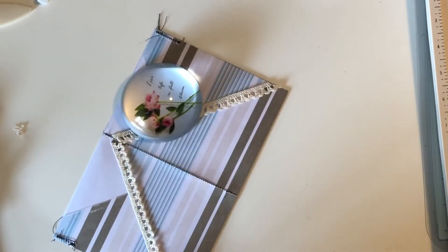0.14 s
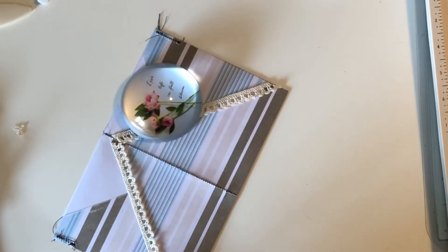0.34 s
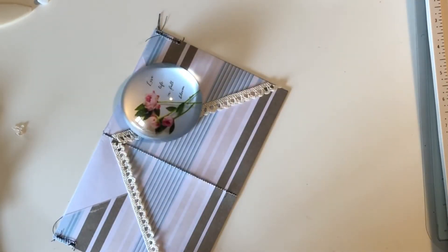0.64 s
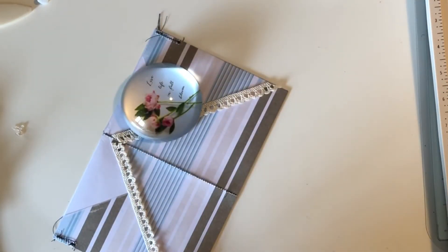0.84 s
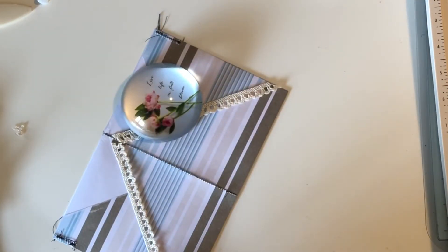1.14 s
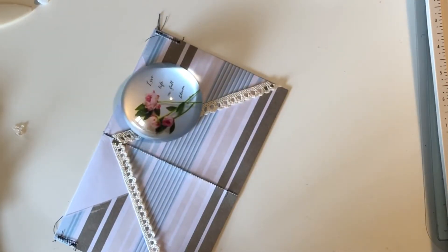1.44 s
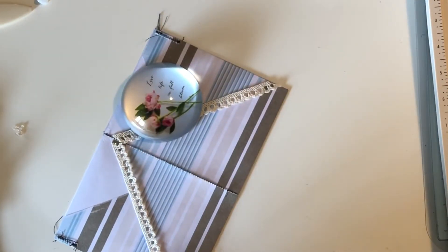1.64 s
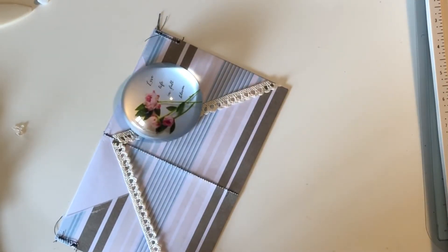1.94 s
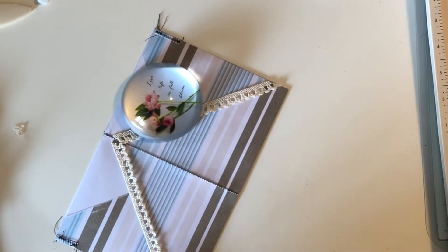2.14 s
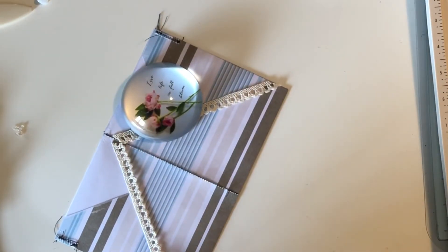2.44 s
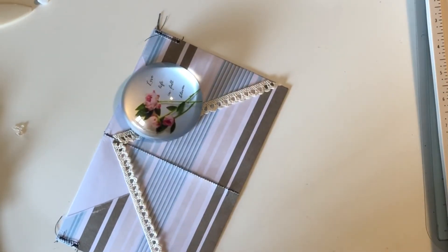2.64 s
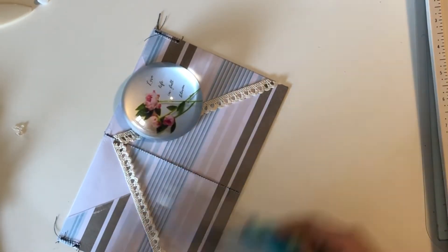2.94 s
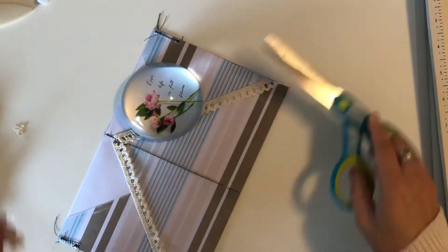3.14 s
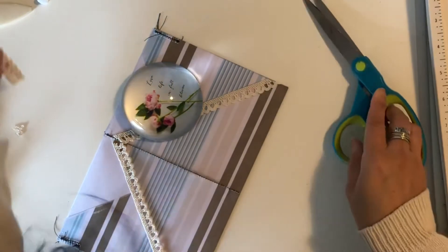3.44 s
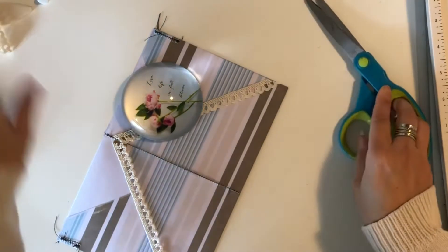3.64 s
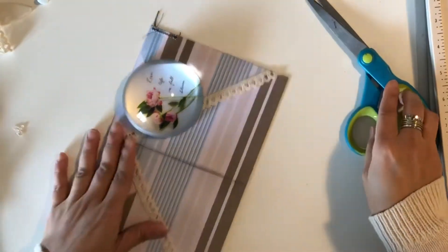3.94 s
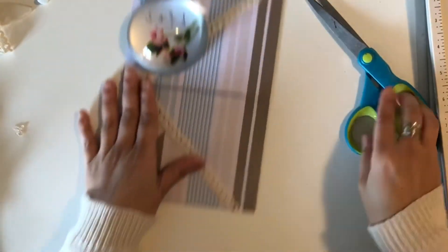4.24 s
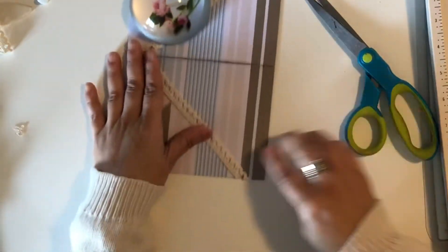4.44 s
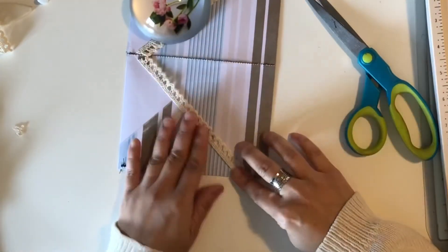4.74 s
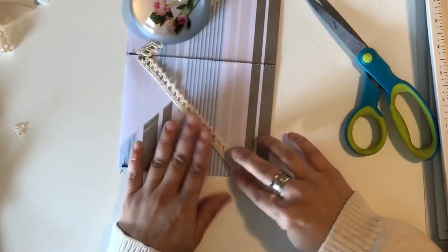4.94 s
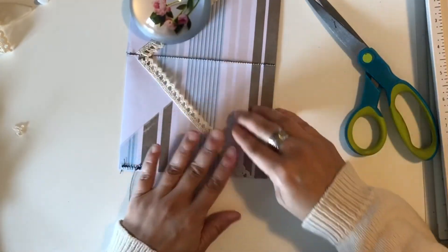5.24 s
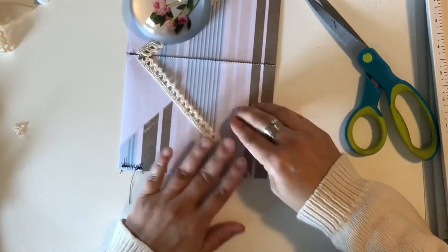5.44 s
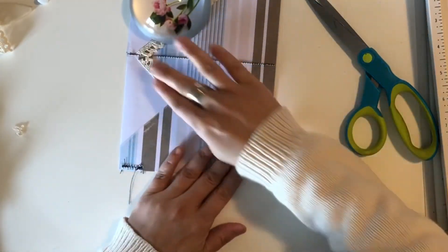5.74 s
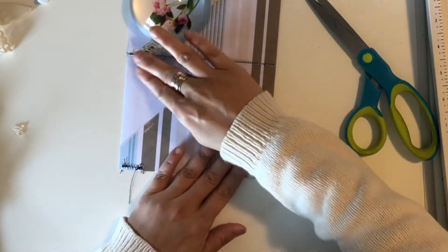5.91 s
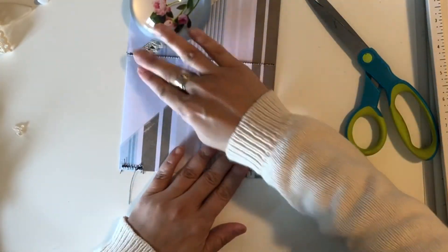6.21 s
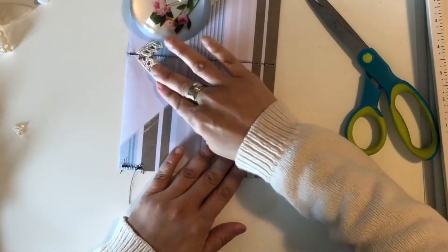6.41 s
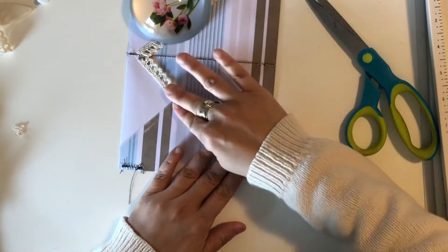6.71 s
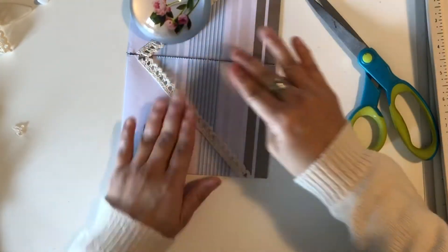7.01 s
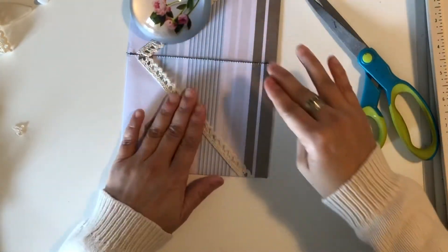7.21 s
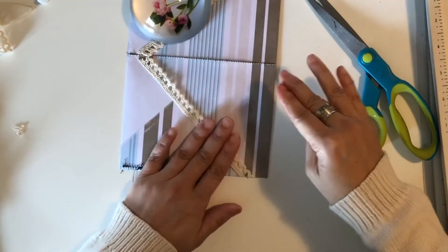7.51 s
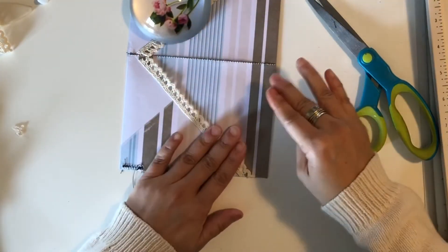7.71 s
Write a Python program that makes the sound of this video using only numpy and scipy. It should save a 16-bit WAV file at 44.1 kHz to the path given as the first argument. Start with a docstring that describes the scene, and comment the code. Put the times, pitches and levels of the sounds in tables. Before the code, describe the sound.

In a quiet room, table knocks and a short scissor crunch lead to a smooth card hiss, then soft finger thuds and faint rustles.

```python
"""A craft table in a quiet room, close to one microphone, over a steady hush and a heaving rumble.
First, things are set down: each contact ticks, clacks and pings, then sends a bending wave through the
tabletop, high tones first. Scissors then chew through lace in crackling, grinding jerks and are laid on the board.
Next a hand slides a sheet of card, a smooth friction hiss, and fingers pat and smooth it: soft ticks and thuds
among brushes and lone crackles."""
import sys
import numpy as np
from scipy import signal
from scipy.fft import rfft, irfft, next_fast_len
from scipy.io import wavfile
from scipy.ndimage import uniform_filter1d, map_coordinates

SR = 44100
rng = np.random.default_rng(int(sys.argv[2]) if len(sys.argv) > 2 else 0)


def to_wav(sig):
    """Store sig (one row per channel, or 1-D mono) as 16-bit WAV at the path in sys.argv[1].

    Samples outside -1..1 are clipped; the rate is SR.
    """
    pcm = np.clip(np.atleast_2d(sig), -1, 1) * 32767
    pcm = np.round(pcm).astype(np.int16)
    wavfile.write(sys.argv[1], SR, pcm.T)  # frames by channels


N = 347066  # samples

# Hard things meeting the table. Each row: start in seconds, tick level in dB, tick lift above 8 kHz in dB,
# clack level in dB, clack centre in Hz, ping level in dB, ping centre in Hz, low and middle board levels in dB.
TAPS = [(0.2693, -44, -30, -35.5, 1140, -42, 1960, -38.5, -29.5),
        (0.6903, -63, -25, -51, 1160, -57.5, 1920, -47.5, -40.5),
        (1.3419, -68, -17, -55, 1150, -68, 1970, -56.5, -45.5),
        (1.4878, -66, -18, -61, 780, -72, 1950, -61.5, -62.5),
        (1.786, -57, -16, -69, 703, -74, 2380, -56.5, -63.5),
        (1.8962, -52, 3, -45.5, 750, -58, 1940, -40, -40),
        (1.9185, -58, -15, -53, 710, -59, 2300, -45, -43),
        (2.4399, -40, -29, -49, 703, -39, 1960, -32.5, -28),
        (2.4541, -49, -19, -50, 826, -44, 1980, -39.5, -33.5),
        (2.4869, -40, -19, -39, 704, -44, 1960, -45, -33),
        (2.6727, -48, -7, -54, 1820, -39, 2330, -48.5, -65),
        (3.28, -51.5, -21, -53, 1320, -57.5, 2150, -49.5, -52),
        (3.3936, -38.5, -28, -37.5, 950, -49, 1930, -39.5, -30),
        (3.5214, -55, -3.5, -60, 1260, -66, 2390, -71, -67),
        (3.5778, -50.5, -14, -31, 1340, -44, 1820, -67, -43.5),
        (3.5933, -61, -20, -42, 1650, -53, 1800, -52.5, -49),
        (3.702, -64, -18, -55, 1300, -66, 2090, -64, -51.5),
        (3.7483, -35, -15, -29.5, 740, -33, 3140, -49.5, -41),
        (3.8188, -43, -15, -37.5, 1190, -47, 1800, -37, -38)]
# Fingers landing on the card. Each row: start in seconds, tick, clack, low board and middle board levels in dB.
PATS = [(3.8399, -42, -58, -41, -53.5), (4.99, -39, -43, -36, -30.5), (5.252, -41, -49, -29, -28.5),
        (5.452, -43, -48, -29, -26.5), (5.886, -61, -76, -59.5, -63.5), (6.2537, -59, -68, -63.5, -68.5),
        (6.542, -59, -75, -55, -60), (7.0225, -43, -46, -32, -33), (7.333, -35, -35, -27, -19.5),
        (7.5023, -58, -55, -57.5, -51.5), (7.604, -39, -41, -30, -24.5), (7.6977, -57, -55, -50, -52.5)]
# Modes of the tabletop. Each row: frequency in Hz, relative level in dB, time to fall 60 dB in seconds.
BOARD_MODES = [(72.4, -6.5, 0.15), (122, 1.5, 0.1), (148.3, 4, 0.0726), (222, -1.5, 0.0525),
               (255, 3.5, 0.054), (303.7, -2.5, 0.0564), (496, -2, 0.0351), (605, -6.5, 0.04),
               (747, -7, 0.0028)]
# Low, middle and high board modes in turn. Each row: rise in seconds, passing time of the packet in seconds.
PACKETS = [(.004, .027), (.0011, .024), (.0009, .019)]
# What rings on after the packet. Each row: frequency in Hz, relative level in dB, time to fall 60 dB in seconds.
LINGER_MODES = [(236, -3, .2), (258, 0, .24)]
# The table rocking on its legs. Each row: frequency in Hz, relative level in dB, time to fall 60 dB in seconds.
SWAY_MODES = [(81.6, 1, 0.2), (98.3, -2, .14)]
# Hard things that clack. Each row: frequency in Hz, relative level in dB, free time to fall 60 dB in seconds.
HANDLE_MODES = [(755, 3, 0.041), (847, -3.5, 0.072), (950, -4, 0.042), (1140, -0.5, 0.039), (1226, 7, 0.03),
                (1300, -8.5, 0.062), (1447, -4.5, 0.052), (1688, -1, 0.03), (1960, -2, 0.03),
                (2240, 4.5, 0.013), (2530, -1, 0.019), (3113, 2, 0.019), (3314, -2, 0.023),
                (3720, -10, 0.021), (4740, -4, 0.019)]
# Dense small modes of a knock. Each row: frequency in Hz, relative density in dB per Hz.
WOODY_SPECTRUM = [(350, -40), (600, -3), (1100, 1.5), (1600, -2), (2200, -6), (3500, -11.5), (7000, -30)]
# Scuffs and ticks. Each row: frequency in Hz, relative density in dB per Hz.
CRACKLE_SPECTRUM = [(500, -34), (1200, 2.5), (2000, -0.5), (4000, 2), (6500, 1.5), (9500, -3.5),
                    (12000, -0.5), (16000, -5.5)]
# Jerks of the blades through lace. Each row: start in seconds, crackle peak in dB, lift above 8 kHz in dB,
# board knock in dB.
BITES = [(2.088, -63, -13, -62), (2.116, -60, -15, -54), (2.127, -54.5, -12, -51), (2.141, -60, -15, -54),
         (2.152, -56, -10, -49), (2.173, -55.5, -6, -48), (2.207, -52, -2, -42), (2.24, -56, -7, -47),
         (2.2665, -52, 0, -40), (2.29, -53, 2, -41), (2.305, -56, 2, -40), (2.423, -65, -11, -55),
         (2.4314, -54.5, 1, -47), (2.445, -62, 5, -47), (2.4714, -57, 4, -43)]
# Lace parting steadily between jerks. Each row: start in seconds, length in seconds, level in dB.
CUTS = [(2.075, .28, -65), (2.42, .1, -66)]
# Lace parting. Each row: frequency in Hz, relative density in dB per Hz.
LACE_SPECTRUM = [(500, -34), (1500, -5), (4000, 1), (7200, 0), (8300, -7), (10500, -8), (11800, 1),
                 (14000, 1), (16000, -3)]
# Grinding blades. Each row: frequency in Hz, relative density in dB per Hz.
BLADE_SPECTRUM = [(240, -49), (400, 9), (426, -22), (597, 3.5), (1120, 3), (1610, -16.5), (1940, -7),
                  (2560, -16), (3050, -10), (6460, -36), (8000, -50), (10400, -42), (17600, -120)]
# Blades and handles working on the board. Each row: start in seconds, length in seconds, grind level in dB,
# board shake in dB.
RUBS = [(1.48, .05, -67, -64), (1.53, .08, -69, -66), (2.075, .1, -55, -60), (2.13, .24, -58, -54),
        (2.43, .1, -54, -46), (3.285, .055, -61, -60), (3.585, .08, -59, -59), (3.62, .14, -63, -55),
        (3.73, .03, -55, -60), (7.69, .07, -58.5, -61)]
# A dragged handle singing. Each row: start in seconds, length in seconds, level in dB.
SINGS = [(3.69, .065, -57)]
# The mode it sings on. Each row: frequency in Hz, relative level in dB, time to fall 60 dB in seconds.
SING_MODES = [(1300, 0, 0.084)]
# The card slid across the board. Each row: time in seconds, level in dB, treble lift in dB.
SLIDE = [(3.822, -58, 2), (3.845, -51, 1), (3.882, -61, -4), (3.932, -51, -5), (4.05, -47.5, 0),
         (4.156, -44.5, 4.5), (4.31, -49, -3), (4.45, -66, -6), (4.48, -64, 1), (4.58, -82, -8)]
# Light brushes of card, lace, skin or sleeve. Each row: start in seconds, length in seconds, peak in dB,
# treble lift in dB.
BRUSHES = [(1.49, .06, -72, -8), (1.9, .06, -75, -5), (2.49, .07, -72, 2), (2.65, .06, -66, -5),
           (2.82, .5, -78, 8), (3.33, .46, -79, 8), (4.63, .14, -65, -3), (4.855, .07, -68, 8),
           (5.135, .05, -72, 6), (6.76, .04, -75, 4), (6.83, .18, -66, -18), (7.17, .04, -64, 0),
           (7.2, .07, -70, -15), (7.62, .14, -70, -12)]
# Gliding card. Each row: frequency in Hz, relative density in dB per Hz.
CARD_SPECTRUM = [(180, -48), (300, -11), (348, -17), (404, -24), (492, -7), (535, -7.5), (620, -9),
                 (1070, -13), (1370, -4.5), (1560, -10.5), (4350, -0.5), (8280, -4.5), (15500, -5.5)]
# Card and lace crackling once. Each row: start in seconds, peak in dB, lift above 8 kHz in dB, length in seconds.
SCUFFS = [(2.642, -71, -5, .01), (3.203, -73, 3, .018), (3.298, -68, -19, .022), (3.313, -68.5, -18, .018),
          (3.3796, -66, -28, .017), (3.526, -68, -3, .019), (3.5593, -68, -3, .013), (4.656, -65, -3, .01),
          (4.712, -65.5, -12, .021), (4.862, -71, -6, .015), (5.185, -63, -3, .006),
          (5.2378, -55, -10, .006), (5.347, -72, 5, .024), (6.092, -73.5, 4, .017),
          (6.4064, -76.5, 4, .022), (6.71, -76, 4, .022), (7.173, -71, -2, .015), (7.573, -66, -5, .005),
          (7.62, -67, -15, .025), (7.78, -72, 1, .03)]
# Room and microphone noise. Each row: frequency in Hz, relative density in dB per Hz.
HUSH_SPECTRUM = [(59, -55), (100, 3), (328, -4), (373, -5), (570, -9.5), (1950, -20), (2220, -19.5),
                 (2800, -22.5), (3250, -21.5), (14700, -32), (16000, -26)]
# The house rumbling, before its random heave. Each row: time in seconds, level in dB.
RUMBLE = [(0.0, -68), (0.45, -63), (0.9, -67), (1.25, -64), (2.0, -70), (4.5, -68), (5.5, -63), (6.5, -68),
          (7.4, -66), (7.87, -59)]
# Rumble. Each row: frequency in Hz, relative density in dB per Hz.
RUMBLE_SPECTRUM = [(20, -6), (35, 1), (50, 7), (75, -0.5), (130, -13), (250, -36)]
# Decay of the room. Each row: frequency in Hz, time to fall 60 dB in seconds.
WALL_T60 = [(100, 0.33), (1000, 0.21), (4000, 0.19), (12000, 0.085)]
# How much reaches the walls. Each row: frequency in Hz, level in dB.
WALL_LEVEL = [(100, -17), (300, -21.5), (800, -14.5), (2500, -11.5), (10000, -13.5)]

TAP_TICK_S, PAT_TICK_S = .012, .016  # time to fall 60 dB
TAP_RING, PAT_RING = .85, .42  # share of the free ringing time left
PAT_PING_HZ, PAT_CLACK_HZ = 3100, 880
PAT_AIR_DB, PAT_PING_DB = -5, -14  # top above 8 kHz and ping, against the tick
LEAD_S, LEAD_LENGTH_S = .008, .015  # crackle ahead of a fingertip
LEAD_DB, LEAD_AIR_DB = -17, 2  # against the tick; lift above 8 kHz
HIGH_UNDER_MID_DB, HIGH_UNDER_CLACK_DB = -11, -10  # high board modes under middle board, under clack
DENSE_DB, SWAY_DB, LINGER_DB = -10, -13.5, -31  # against clack, low board, middle board
SPREAD_DB = 2.5  # random spread of mode strengths
BITE_S, BITE_GRIND_DB, BITE_LOW_DB = .017, 5, -1  # length; grind against crackle; low against middle board
CUT_AIR_DB = -9  # lift above 8 kHz
RISE_SHARE = .35  # part of a stroke spent swelling
HUSH_DB = -71.2
TOP_HZ = 15900


def taps():
    """Hard things load the board at once; fingertips squash first."""
    hard = contacts(TAPS, TAP_TICK_S, TAP_RING, press_s=.0005, tick_rise_s=.0004)
    pats = [(s, db, PAT_AIR_DB, clack_db, PAT_CLACK_HZ, db + PAT_PING_DB, PAT_PING_HZ, low_db, mid_db)
            for s, db, clack_db, low_db, mid_db in PATS]
    return hard + contacts(pats, PAT_TICK_S, PAT_RING, press_s=.001, tick_rise_s=.0018)


def contacts(table, tick_s, ring_share, press_s, tick_rise_s):
    """Surfaces tick, clack and ping; the board's modes answer once it takes the load, press_s later."""
    t = np.arange(SR // 4) / SR
    tick, air, clack, dense, board = np.zeros((5, N + SR))
    held = [(hz, db, t60 * ring_share) for hz, db, t60 in HANDLE_MODES]
    body = [m for m in held if m[0] < 1800]
    ping = [m for m in held if m[0] > 1800]
    for s, tick_db, air_db, clack_db, clack_hz, ping_db, ping_hz, low_db, mid_db in table:
        at = slice(round(s * SR), round(s * SR) + len(t))
        fade = amp(tick_db - 60 * t / tick_s) * (1 - np.exp(-t / tick_rise_s))
        tick[at] += fade
        air[at] += fade * amp(air_db)
        clack[at] += amp(clack_db) * ring(favoured(body, clack_hz), t, SPREAD_DB)
        clack[at] += amp(ping_db) * ring(favoured(ping, ping_hz, narrow_db=40), t, SPREAD_DB)
        dense[at] += amp(clack_db + DENSE_DB - 60 * t / .053) * (1 - np.exp(-t / .0017))
        high_db = max(mid_db + HIGH_UNDER_MID_DB, clack_db + HIGH_UNDER_CLACK_DB)
        board[round((s + press_s) * SR):][:len(t)] += thud(low_db, mid_db, high_db)
    ticks = crackle(tick, air, CRACKLE_SPECTRUM, grain_db=1.5)
    chatter = 1 + .3 * wobble(1500)  # the surfaces rattle while they touch
    knocks = clack[:N] * chatter + dense[:N] * hiss(WOODY_SPECTRUM)
    return ticks + knocks + filtered(board[:N], bending)


def thud(low_db, mid_db, high_db):
    """Three groups of board modes as a packet that runs off, a faint ring after it and the table's sway."""
    t = np.arange(SR // 4) / SR
    packet = 0
    bands_hz = [(0, 180), (180, 400), (400, 800)]
    for db, (lo, hi), (rise_s, passing_s) in zip([low_db, mid_db, high_db], bands_hz, PACKETS):
        modes = [m for m in BOARD_MODES if lo < m[0] < hi]
        gate = np.exp(-(t / passing_s) ** 4)
        packet = packet + amp(db) * ring(modes, t, SPREAD_DB, rise_s, shape=1.58) * gate
    after = amp(mid_db + LINGER_DB) * ring(LINGER_MODES, t, SPREAD_DB, rise_s=.02)
    sway = amp(low_db + SWAY_DB) * ring(SWAY_MODES, t, SPREAD_DB, rise_s=.0093)
    return packet + after + sway


def bending(hz):
    """Bending waves travel slower the lower they are; the far edge sends the low ones back."""
    lag_s, edge_s, edge_hz = .0019, .045, 130  # lag at 1 kHz
    back = amp(-8) * np.exp(-2j * np.pi * hz * edge_s) / (1 + (hz / edge_hz) ** 4)
    return np.exp(-4j * np.pi * lag_s * np.sqrt(1000 * hz)) * (1 + back)


def favoured(modes, centre_hz, narrow_db=14):
    """The spot struck favours modes near its centre; narrow_db is the loss one octave away."""
    return [(hz, db - narrow_db * np.log2(hz / centre_hz) ** 2, t60) for hz, db, t60 in modes]


def ring(modes, t, scatter_db, rise_s=.00069, shape=1):
    """Struck modes, peak 1; a shape over 1 holds the ring, then drops it, as a wave packet passing."""
    x = 0
    for hz, db, t60 in modes:
        strength_db = db + scatter_db * rng.standard_normal()
        x = x + amp(strength_db - 60 * (t / t60) ** shape) * np.sin(2 * np.pi * hz * t)
    x = x * (1 - np.exp(-t / rise_s))
    return x / np.abs(x).max()


def bites():
    """Each jerk of the blades crackles, grinds and knocks the board; lace parts steadily between."""
    body, air = puffs([(*row[:3], BITE_S) for row in BITES])
    steady = amp(np.transpose(CUTS)[2]) @ strokes(CUTS) * amp(2.5 * wobble(90))
    board = np.zeros(N + SR)
    for s, _, _, db in BITES:
        board[round(s * SR):][:SR // 4] += thud(db + BITE_LOW_DB, db, db + HIGH_UNDER_MID_DB)
    grinding = amp(BITE_GRIND_DB) * body[:N] * hiss(BLADE_SPECTRUM, grain_db=2.5)
    lace_air = air[:N] + amp(CUT_AIR_DB) * steady
    lace = crackle(body[:N] + steady, lace_air, LACE_SPECTRUM, grain_db=4)
    return lace + grinding + filtered(board[:N], bending)


def grind():
    """Uneven rubbing of the blades shakes the board's modes; a dragged handle sings on one mode."""
    rub, shake = amp(np.transpose(RUBS)[2:]) @ strokes(RUBS)
    blades = rub * amp(2.9 * wobble(60)) * hiss(BLADE_SPECTRUM, grain_db=2.5)
    shaken = shake * driven(BOARD_MODES[1:])  # all but the lowest mode
    singing = amp(np.transpose(SINGS)[2]) @ strokes(SINGS) * driven(SING_MODES)
    return blades + shaken + singing


def driven(modes):
    """Modes kept ringing by random rubbing, rms 1."""
    response = ring(modes, np.arange(SR // 4) / SR, scatter_db=.5)
    return unit(signal.fftconvolve(rng.standard_normal(N), response)[:N])


def glide():
    """Friction hiss; a bright touch lifts treble and thins the body below 3.5 kHz, a dull one the reverse."""
    db, lift_db = curves([SLIDE], quiet=[-120, 0])
    touch = strokes(BRUSHES)
    peak_db, brush_lift_db = np.transpose(BRUSHES)[2:]
    lift_db = lift_db + brush_lift_db @ (touch > 0)
    level = amp(db) + amp(peak_db) @ touch
    rub = hiss(CARD_SPECTRUM, grain_db=1) * level * amp(.6 * wobble(34))
    body = filtered(rub, lambda hz: 1 / (1 + (hz / 3500) ** 4))
    return rub + (amp(lift_db) - 1) * filtered(rub, airy) + (amp(-.35 * lift_db) - 1) * body


def scuffs():
    """Lone crackles of card and lace, and one of the card just before every fingertip lands."""
    leads = [(s - LEAD_S, db + LEAD_DB, LEAD_AIR_DB, LEAD_LENGTH_S) for s, db, *_ in PATS]
    return crackle(*puffs(SCUFFS + leads), CRACKLE_SPECTRUM, grain_db=3.5)


def crackle(body, air, spectrum, grain_db):
    """Crackle noise whose middle and top follow their own envelopes."""
    noise = hiss(spectrum, grain_db)
    top = filtered(noise, airy)
    return body[:N] * unit(noise - top) + air[:N] * unit(top)


def puffs(rows):
    """Envelopes of puffs that swell and die, peaking a third into the length, for middle and top."""
    body, air = np.zeros((2, N + SR))
    for s, db, air_db, length_s in rows:
        u = np.arange(SR // 4) / SR / length_s * 3
        puff = amp(db) * u ** 2 * np.exp(2 - 2 * u)
        body[round(s * SR):][:len(u)] += puff
        air[round(s * SR):][:len(u)] += puff * amp(air_db)
    return body, air


def strokes(rows):
    """One gain curve for each row's start and length: a swell, then a slower fade."""
    start_s, length_s = np.transpose(rows)[:2, :, None]
    u = (np.arange(N) / SR - start_s) / length_s
    ramp = np.clip(np.minimum(u / RISE_SHARE, (1 - u) / (1 - RISE_SHARE)), 0, 1)
    return np.sin(np.pi / 2 * ramp) ** 2


def hiss(spectrum, grain_db=0):
    """Coloured noise of rms 1; grain makes single samples stand out, as fibres catching."""
    grains = amp(grain_db * np.minimum(rng.exponential(size=N), 4))
    return unit(filtered(rng.standard_normal(N) * grains, lambda hz: amp(along(spectrum, hz))))


def airy(hz):
    """The share of a sound above 8 kHz."""
    return 1 / (1 + (8000 / (hz + 1)) ** 6)


def wobble(rate_hz):
    """A smooth random curve through rate_hz knots a second."""
    knots = rng.standard_normal(int(N * rate_hz / SR) + 4)
    return map_coordinates(knots, [np.arange(N) * rate_hz / SR])


def curves(spans, quiet):
    """One value per sample for each column after the time, smoothed over 5 ms; quiet outside the spans."""
    t = np.arange(N) / SR
    out = np.tile(np.reshape(quiet, (-1, 1)), N).astype(float)
    for rows in spans:
        s, *cols = np.transpose(rows)
        inside = (t >= s[0]) & (t <= s[-1])
        out[:, inside] = [np.interp(t[inside], s, c) for c in cols]
    return uniform_filter1d(out, size=221, axis=1)


def along(points, hz):
    """(Hz, value) points interpolated on a log frequency axis."""
    f, v = np.transpose(points)
    return np.interp(np.log(hz + 1), np.log(f + 1), v)


def filtered(x, response):
    """x through a complex response of frequency, zero-padded by at least half a second."""
    m = next_fast_len(x.shape[-1] + SR // 2)
    return irfft(rfft(x, m) * response(np.fft.rfftfreq(m, 1 / SR)), m)[..., :x.shape[-1]]


def unit(x):
    """Scaled to rms 1."""
    return x / np.sqrt(np.mean(x ** 2) + 1e-20)


def amp(db):
    """Decibels to gain."""
    return 10 ** (np.asarray(db) / 20)


def room(x):
    """The walls' answer, each frequency dying at its own speed; three tails take turns to vary the hits."""
    hz, t, z = signal.stft(rng.standard_normal((3, SR // 2)), SR, nperseg=256)
    decay = amp(-60 * t / along(WALL_T60, hz)[:, None])
    tails = signal.istft(z * decay, SR, nperseg=256)[1]
    turn = np.arange(N) // (SR // 5) % 3  # 0.2 s each
    late = np.pad(x, (SR // 200, 0))[:N]  # 5 ms
    wet = 0
    for k, tail in enumerate(tails):
        wet = wet + signal.fftconvolve(late * (turn == k), tail / np.linalg.norm(tail))[:N]
    return filtered(wet, lambda hz: amp(along(WALL_LEVEL, hz)))


def background():
    """Steady hush over a slowly heaving rumble."""
    rumble_db = curves([RUMBLE], quiet=[-120])[0] + 2.4 * wobble(7.5)
    return amp(HUSH_DB) * hiss(HUSH_SPECTRUM) + amp(rumble_db) * hiss(RUMBLE_SPECTRUM)


def scene():
    """One microphone feeds both channels."""
    work = taps() + bites() + grind() + glide() + scuffs()
    return np.tile(work + room(work) + background(), (2, 1))


def record(dry):
    """The microphone rolls off the deep bass; nothing is kept above the band limit."""
    return filtered(dry, lambda hz: (1j * hz / (50 + 1j * hz)) ** 4 * (hz < TOP_HZ))


dry = scene()
out = record(dry)
to_wav(out)
```